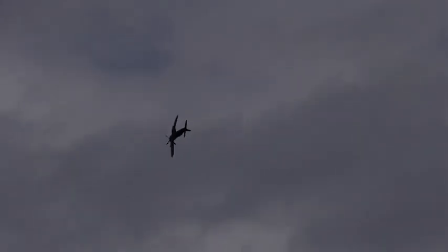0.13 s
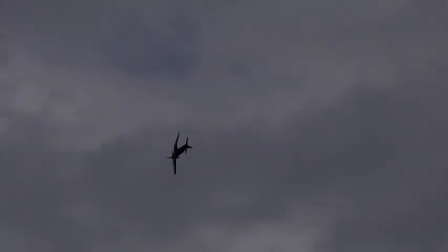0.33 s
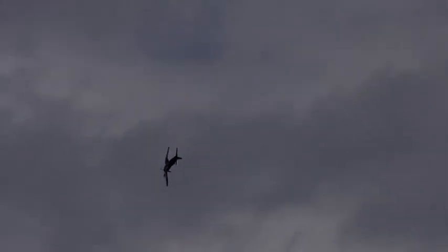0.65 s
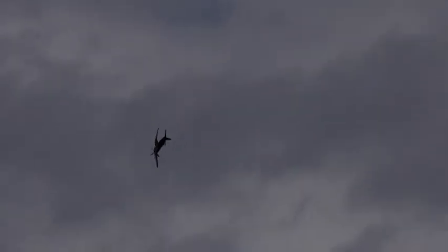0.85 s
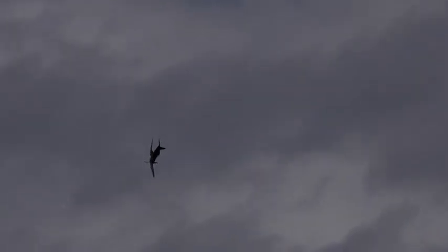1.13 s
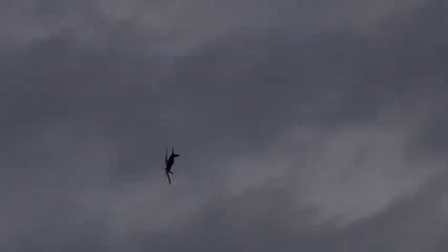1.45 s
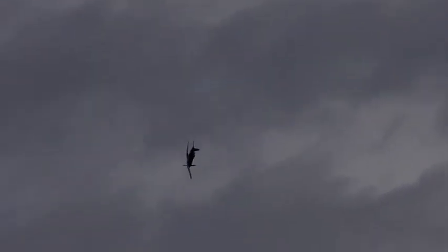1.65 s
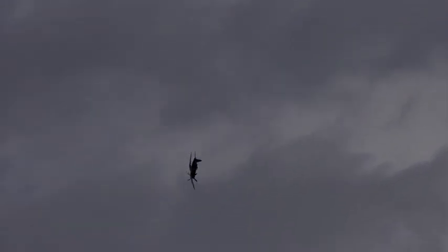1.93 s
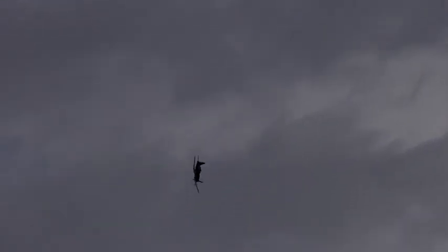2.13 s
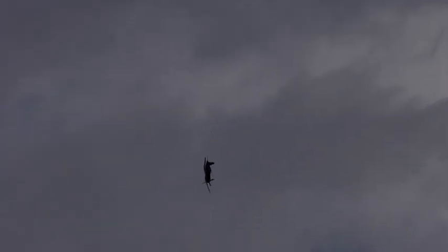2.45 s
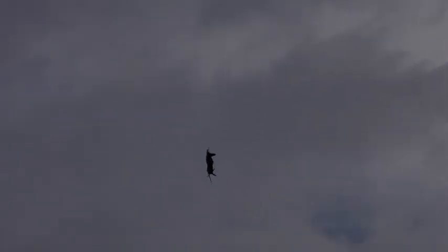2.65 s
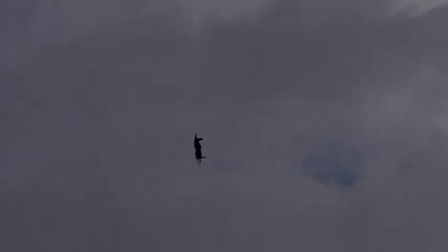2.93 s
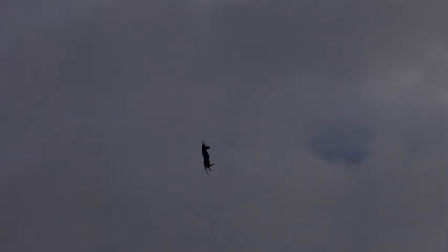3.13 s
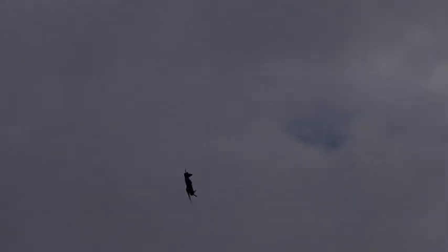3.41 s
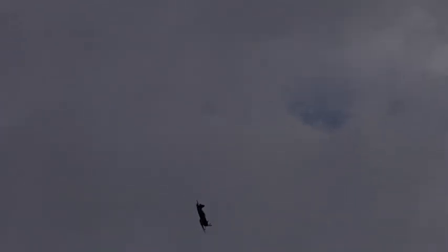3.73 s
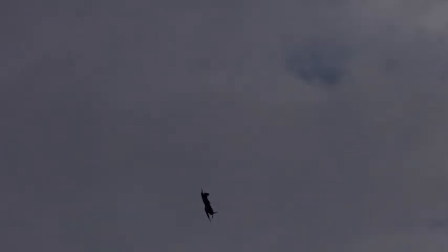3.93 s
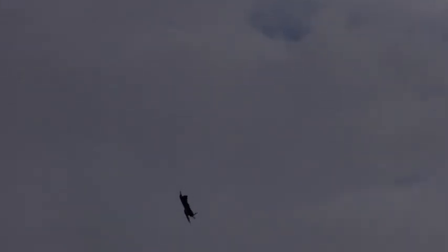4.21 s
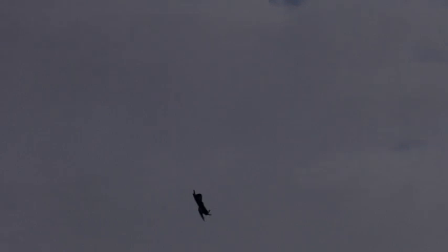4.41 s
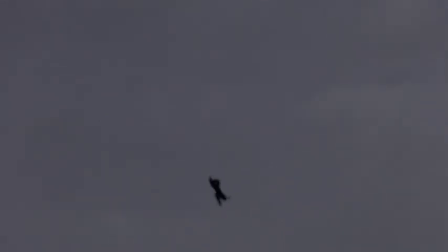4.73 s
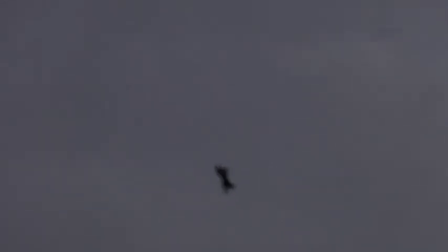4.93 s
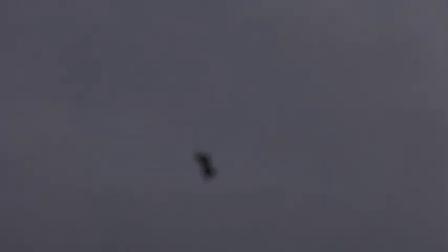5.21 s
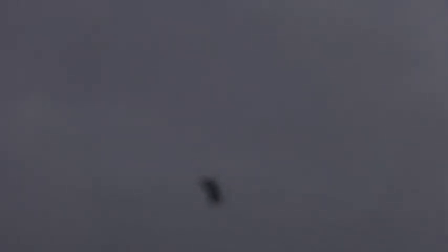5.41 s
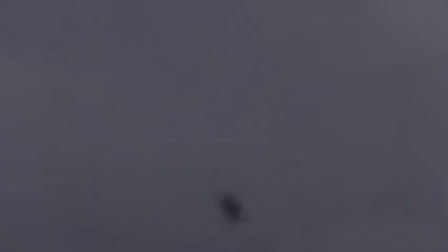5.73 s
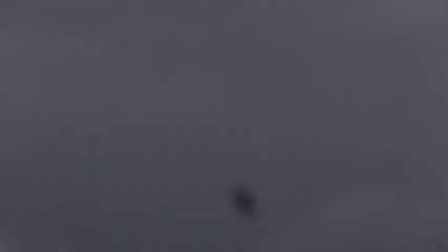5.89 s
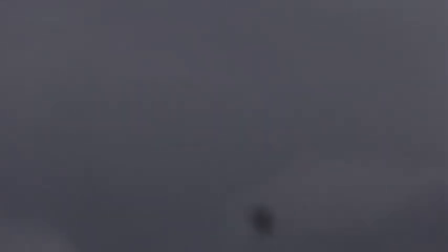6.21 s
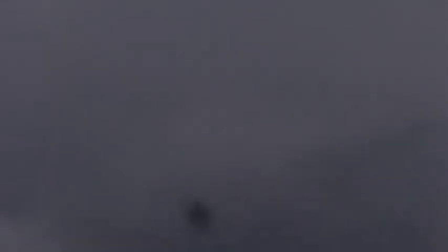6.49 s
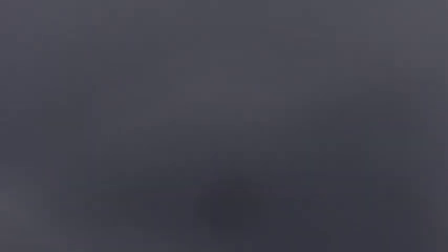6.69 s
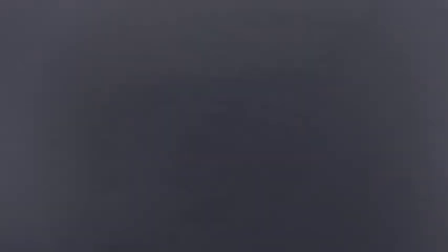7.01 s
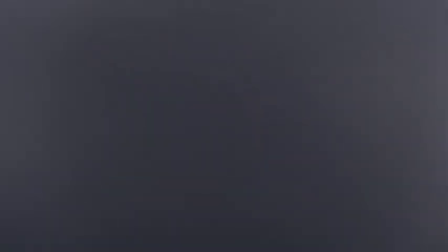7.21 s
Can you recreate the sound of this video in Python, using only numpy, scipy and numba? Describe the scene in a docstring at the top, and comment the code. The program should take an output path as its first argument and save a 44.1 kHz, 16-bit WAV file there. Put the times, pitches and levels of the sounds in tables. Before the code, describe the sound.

Steady, throbbing drone of a propeller plane turning high above, with occasional exhaust cracks, wind buffets and faint close ticking.

```python
"""An airfield, with a big piston-engined propeller plane looping high overhead.
The eighteen firings of each engine cycle give a throbbing stack of tones under a turbulent roar,
with the odd sharp exhaust crack. Gusts thump on the two microphone ports, something close by
rustles and ticks, and the sound drops out once."""
import sys
import numpy as np
from scipy import signal
from scipy.fft import rfft, irfft
from scipy.io import wavfile
from scipy.ndimage import uniform_filter1d
from numba import njit

SR = 44100
rng = np.random.default_rng(int(sys.argv[2]) if len(sys.argv) > 2 else 0)


def waveform_to_disk(signal):
    """Save audio, clipped to [-1, 1], as 16-bit WAV at the path in sys.argv[1]."""
    frames = np.transpose(np.atleast_2d(signal))
    scaled = np.clip(frames, -1, 1) * 32767
    samples = np.round(scaled).astype(np.int16)
    wavfile.write(sys.argv[1], SR, samples)


N = 324135
T = np.arange(N) / SR
HZ = np.maximum(np.arange(N // 2 + 1) * SR / N, 1)
CYLINDERS = 18
ANTIPHASE = np.array([[1], [-1]])  # left and right in opposite polarity

# swells of the nearby rustle: (time [s], level [dB], top band relative to that [dB])
RUSTLE_SWELLS = [(0.0, -63.5, -6), (.14, -63.5, -13), (.6, -56, -8.5), (1.0, -61, -7.5), (1.3, -59, -11),
                 (1.45, -56, -7), (1.8, -58.5, -5.5), (2.3, -65.5, -9.5), (2.55, -72.5, -8),
                 (2.76, -65.5, -16.5), (2.9, -77, -27.5), (3.3, -70.5, -8.5), (3.6, -73, -12),
                 (3.74, -85.5, -15.5), (4.3, -70.5, 1), (4.65, -61.5, -7), (4.8, -67.5, -5.5),
                 (5.1, -61, -5.5), (5.64, -71.5, -4), (5.87, -55.5, -2.5), (6.3, -61, -5), (6.7, -66, -4.5),
                 (6.84, -61.5, -1), (6.96, -77, -12), (7.1, -66, -5.5), (7.35, -66.5, -2)]
# tone colour of the rustle's main band and the tick tails: (frequency [Hz], level [dB])
RUSTLE_SPECTRUM = [(1500, -22), (3000, -1), (4500, -1), (6000, 0), (7800, -8), (10000, -13)]


def engine_tones(cycle, shimmer_db=1.0, weak_shimmer_db=2.5):
    """Multiples (orders) of the engine's cycle rate, bunched in time so that each cycle throbs."""
    # tones with a level of their own, strong and medium: (order)
    strong_orders = [7, 11, 14, 18, 25]
    mid_orders = [10, 12, 13, 15, 16, 17]
    # two groups of weak tones: (order, level within the group [dB])
    low_orders = [(4, -9), (5, -20), (6, -19.5), (8, 2.5), (9, 0)]
    high_orders = [(19, 3), (20, 0), (21, 3), (22, -5), (23, -1), (24, 7.5), (26, 4.5), (27, 5), (28, -0.5),
                   (29, -8), (30, -15.5)]
    # single tones swell or fade for a moment: order -> (time [s], change [dB], half length [s])
    wavers = {10: [(6.4, 4, .3)], 11: [(1.25, 5.5, 0.26), (5.8, -9.5, 0.29)], 13: [(0.0, -0.5, 0.36),
              (2.25, -6, .15), (6.3, 7.5, 0.64)], 14: [(0.0, -5, 0.13), (1.8, -8.5, 0.097),
              (3.6, -1.5, 0.099), (5.7, -2.5, 0.12)], 15: [(0.0, -4, 0.63), (1.35, 5.5, 0.36),
              (4.0, 4, 0.32), (6.3, 6, 0.9)], 16: [(1.8, -8.5, 0.37), (3.15, 8.5, 0.17),
              (4.5, -29.5, 0.096)], 17: [(.8, -2, 0.27), (1.4, 3.5, 0.25), (4.0, 6, .25), (6.45, 10, 0.31)],
              18: [(.55, 5.5, 0.6), (1.8, 2.5, 0.12), (5.4, -5.5, 0.13), (5.72, 5, 0.13),
              (7.1, -2.5, 0.23)], 25: [(2.5, 2, 0.86), (3.02, -10.5, 0.17)]}
    groups = [[(order, 0)] for order in strong_orders + mid_orders] + [low_orders, high_orders]
    gather_s = np.maximum(T - 3.7, 0)  # from 3.7 s on the tones bunch ever tighter
    spread = .05 - .01112 * gather_s
    stack = 0
    for group, level_db in zip(groups, radiated_levels()):
        group_rms = np.sqrt(np.sum(undb(np.array(group)[:, 1]) ** 2) / 2)
        for order, db in group:
            turns = order * cycle - .35 - .14 * gather_s  # all tones slip back as they gather
            turns -= spread * (order - 14) ** 2  # orders far from 14 lag
            turns -= .02223 * (order - 11) * T  # the bunch slides through the cycle as the plane turns
            turns -= .11 * (order % 2)  # the two cylinder rows differ, which shifts the odd orders
            # turbulent air shakes each tone's level and arrival time, the weak ones most
            shake_db = shimmer_db * walk(7) if len(group) == 1 else weak_shimmer_db * walk(4)
            if order not in strong_orders:
                turns += .07 * walk(2.5)
            turns += .04 * walk(9)
            gain = undb(level_db + db + shake_db + swells(wavers.get(order, []))) / group_rms
            sign = -1 if order == 11 else 1  # order 11 pushes against the bunch
            stack += sign * gain * np.cos(2 * np.pi * turns)
    return stack * undb(.8 * walk(35))  # the beats vary in strength


def radiated_levels():
    """Level curve in dB of each tone group as the turning plane shows another side."""
    # what the engine radiates our way at five even stages of the turn:
    # (orders 7, 11, 14, 18, 25, 10, 12, 13, 15, 16, 17 [dB each], low group [dB], high group [dB])
    radiation = [(-33, -27, -30, -38.5, -36.5, -38, -53.5, -31.5, -30.5, -30, -32.5, -35, -30),
                 (-40.5, -22.5, -26, -28, -30.5, -50, -46, -33, -28, -31.5, -29, -40, -30),
                 (-39.5, -25, -25, -23, -34.5, -39, -33, -37.5, -37.5, -41.5, -32, -38, -32),
                 (-32.5, -30.5, -29, -25.5, -54.5, -34, -33.5, -48, -35, -32, -39, -39, -33),
                 (-22, -43, -32, -25.5, -65, -32, -52, -54, -44, -34.5, -37, -39, -31)]
    # the loop: (time [s], stage of the turn [0-1], gain of all tones [dB])
    flight = [(0.0, 0, 3), (0.3, 0.06, 2.5), (0.9, 0.12, 0), (1.2, 0.07, 0), (1.7, 0.11, 1),
              (2.4, 0.23, 1.5), (2.8, 0.34, 1), (3.1, 0.35, 1.5), (3.6, 0.31, 0), (3.9, 0.4, -0.5),
              (4.4, 0.46, -2.5), (4.8, 0.51, 1), (5.1, 0.73, 1), (5.45, 0.62, 0), (5.7, 0.8, 1),
              (6.0, 0.76, -0.5), (6.35, 0.76, 2.5), (6.9, 0.72, -1), (7.35, 0.88, -1)]
    turn, gain_db = curves(flight)
    stages = np.linspace(0, 1, len(radiation))
    return [gain_db + np.interp(turn, stages, db) for db in np.transpose(radiation)]


def exhaust_pulses(cycle, cylinder_db):
    """Every firing gives a bang and a decaying puff of gas, sized by its cylinder and by chance."""
    firing = cycle * CYLINDERS
    index = firing.astype(int)
    chance = np.tanh(rng.standard_normal(index[-1] + 1))[index]
    size = undb(cylinder_db[index % CYLINDERS] + 4.4 * chance)
    bangs = unit(size * np.diff(index, prepend=index[0]))
    flow = .5 + size * np.exp(-(firing % 1) / .66)
    puffs = unit(flow * rng.standard_normal(N))
    return puffs + undb(-12) * bangs


def exhaust_roar(cycle, cylinder_db):
    """The exhaust sounds through six resonances, each drifting and swelling in the turbulent air."""
    # shape of the roar: (time [s], level near 720 Hz [dB], main level [dB], main centre [Hz],
    # level near 1.4 kHz [dB], level near 1.8 kHz [dB])
    contour = [(0.0, -51, -24, 1175, -26.5, -26), (0.12, -29, -32, 1035, -40.5, -44),
               (0.18, -38.5, -32, 1140, -34, -35), (0.35, -23, -27, 942, -33.5, -41.5),
               (0.39, -31.5, -29.5, 1020, -38, -44.5), (0.65, -31.5, -32.5, 940, -40, -40.5),
               (0.96, -34.5, -28, 1080, -31, -38), (1.06, -36, -31, 900, -41, -42),
               (1.33, -33.5, -36.5, 1137, -40, -43), (1.39, -35.5, -29.5, 1150, -35.5, -42),
               (1.49, -32, -31, 1120, -35, -35), (1.6, -32.5, -28.5, 997, -34, -55),
               (1.62, -37.5, -37.5, 1100, -35, -39), (1.76, -31.5, -32.5, 1008, -36.5, -42),
               (2.17, -30.5, -30, 1036, -38, -37), (2.5, -36, -34, 1080, -36.5, -43),
               (2.64, -27.5, -29.5, 870, -42, -41.5), (2.78, -36, -32, 977, -45.5, -47),
               (3.07, -32.5, -33, 1022, -40.5, -46.5), (3.38, -29.5, -27, 916, -40, -46),
               (3.64, -28, -26, 983, -31, -32), (3.83, -35, -33, 926, -39.5, -38),
               (4.07, -30.5, -31.5, 1060, -50, -46), (4.22, -30.5, -28, 1023, -30.5, -34),
               (4.38, -35, -28, 963, -43, -47.5), (4.44, -34, -36, 1073, -40.5, -44),
               (4.79, -31, -32, 1010, -38.5, -42), (5.04, -35, -38.5, 980, -42.5, -46),
               (5.28, -38.5, -36, 1030, -39.5, -46.5), (5.4, -27, -26, 955, -41, -44.5),
               (5.49, -33.5, -29.5, 984, -32.5, -39), (5.73, -33.5, -28.5, 1015, -34, -42.5),
               (5.87, -31.5, -28.5, 963, -40, -45), (6.2, -31, -31, 950, -38.5, -43.5),
               (6.26, -62.5, -30.5, 966, -41.5, -44), (6.47, -29.5, -35.5, 980, -43.5, -48),
               (6.55, -27.5, -27.5, 986, -44, -43.5), (6.86, -40, -40.5, 1056, -43, -43.5),
               (7.27, -30.5, -34, 1038, -41, -44.5), (7.35, -36.5, -31, 1007, -41, -41)]
    # the five resonances around the main one: (centre [Hz])
    side_hz = [393.4, 716.5, 1401, 1840, 2235]
    # all six resonances, low to high: (width [Hz])
    widths = [278, 352, 396, 480, 520, 465]
    below_db, main_db, main_hz, above_db, high_db = curves(contour)
    low_db = -33 + .26 * (main_db - main_db.mean())  # the low end partly follows the main swells
    below_db = np.maximum(below_db, main_db - 11)
    centres = side_hz[:2] + [main_hz] + side_hz[2:]
    levels = low_db, below_db, main_db, above_db, high_db, high_db - 8.5
    exhaust = exhaust_pulses(cycle, cylinder_db)
    # the air bends a second, weaker path, whose wandering delay sweeps a comb over the roar
    delay_s = .0045 + .0006 * walk(2.5)
    exhaust = exhaust + undb(-8) * np.interp(T - delay_s, T, exhaust)
    ragged_db = .9 * walk(18)
    roar = 0
    for hz, width, db in zip(centres, widths, levels):
        band = resonance(exhaust, hz * (1 + .03 * walk(4)), width)
        roar += undb(db + ragged_db + walk(11)) * unit(band)
    return roar


def exhaust_cracks():
    """Sharp cracks from the exhaust, each ringing for a few periods near 1 kHz."""
    # single cracks: (time [s], level [dB], pitch [Hz])
    cracks = [(0.345, -9, 900), (0.825, -15, 973), (1.258, -17.5, 973), (1.374, -14, 1134),
              (1.499, -10, 1094), (2.732, -13.5, 894), (2.869, -27, 984), (4.14, -16.5, 1044),
              (4.258, -16.5, 970), (6.013, -17.5, 1010), (6.531, -23.5, 1010), (6.646, -13.5, 990)]
    return bursts(cracks, cycles=2.65, rise=.71)


def scattered_roar(cycle, cylinder_db, centre_hz=2450, width_hz=3000):
    """A second, thinner roar stands for sound scattered in from the ground, and widens the image."""
    band = 1j * HZ * width_hz / (centre_hz ** 2 - HZ ** 2 + 1j * HZ * width_hz)
    thin_roar = filtered(exhaust_roar(cycle, cylinder_db), band ** 3)
    return undb(-5) * ports(thin_roar) * ANTIPHASE


def wind_buffets(thump_db=-38.5, flutter_db=-40.5):
    """Gusts thump on both microphone ports at once, over a flutter that differs between them."""
    # gusts that raise the thump: (time [s], boost [dB], half length [s])
    gusts = [(0.0, 12.5, 0.1), (.65, 3, 0.22), (1.37, 7.5, 0.091), (1.83, 5, 0.13), (4.25, 13.5, 0.14),
             (4.582, 12.5, 0.096), (5.5, 12, 0.13), (5.968, 11, 0.15), (6.775, 5, 0.063), (7.35, 15, 0.069)]
    # tone colours of the thump and the flutter: (frequency [Hz], level [dB])
    thump_spectrum = [(20, -41), (40, -19.5), (65, -4.5), (100, 1), (200, 3), (450, -16.5)]
    flutter_spectrum = [(20, -15.5), (50, -15.5), (100, 1), (300, -6), (450, -6.5), (900, -27)]
    rustle_db, _ = curves(RUSTLE_SWELLS)
    surge_db = swells(gusts) + .42 * (rustle_db - rustle_db.mean())  # partly follows the rustle
    thump = undb(thump_db + surge_db + 1.7 * walk(6.6)) * wind_noise(thump_spectrum)
    flutter = undb(flutter_db + 2.5 * walk(8)) * wind_noise(flutter_spectrum)
    return thump + flutter * ANTIPHASE


def close_rustle(hiss_db=-69.5):
    """Grainy flurries in two bands, partly different at each port, over a faint steady hiss."""
    # tone colours of the rustle's top band and the hiss: (frequency [Hz], level [dB])
    top_spectrum = [(4000, -24), (6000, 1), (7500, -1.5), (8800, -3.5), (10500, 0.5), (13500, -13),
                    (15000, -12.5), (16000, -24.5)]
    hiss_spectrum = [(2200, -22), (3000, -19.5), (4200, -9.5), (8000, -6), (15500, -16.5)]
    rustle_db, top_db = curves(RUSTLE_SWELLS)
    flurry_db = 1.3 * walk(6) + 1.2 * walk(40) + 1.8 * walk(160)  # shared by both bands
    bed = undb(hiss_db) * np.array([colour(rng.standard_normal(N), hiss_spectrum) for _ in range(2)])
    for spectrum, db in ((RUSTLE_SPECTRUM, rustle_db), (top_spectrum, rustle_db + top_db)):
        grain_db = flurry_db + 1.6 * walk(60) + 4.2 * walk(500)
        grains = undb(grain_db) * rng.standard_normal((3, N))
        both, left, right = (colour(noise, spectrum) for noise in grains)
        bed += undb(db) * (both + 1.31 * np.array([left, right]))
    return np.array([ports(bed[0])[0], ports(bed[1])[1]])


def close_ticks(tail_s=.01, tail_db=-24.5):
    """Each tick is a dull knock, placed left or right, with a bright snap and a grainy tail."""
    # single ticks: (time [s], level [dB], snap relative to that [dB], left minus right [dB])
    ticks = [(0.539, -24, -13, 2), (0.589, -20, -5, 12), (0.8485, -24, -13, 8), (0.9118, -24.5, -9, 15),
             (1.1623, -24, -1, 6), (1.2067, -21, -7, 10), (1.3295, -30, 7, -2.0), (1.4556, -22.5, -17, 17),
             (1.7579, -19.5, -9.5, 11), (2.2223, -45.5, -9.5, 1), (2.6737, -37, -3, 5),
             (3.1815, -29.5, -4.5, -1), (3.48, -37, 1.5, -3), (4.0467, -25.5, -23, 10),
             (4.5755, -45, -16, 12), (5.8556, -38, -4, -13), (6.0437, -32, 2, -1.0), (6.2058, -30, -8, -9)]
    knocks = [bursts([(s, db + side * pan_db / 2, 4800) for s, db, _, pan_db in ticks], cycles=.52)
              for side in (1, -1)]
    snaps = bursts([(s, db + snap_db, 11000) for s, db, snap_db, _ in ticks], cycles=1.4)
    tails = sum(undb(db + tail_db) * (T > s) * np.exp(-abs(T - s) / tail_s) for s, db, *_ in ticks)
    grains = colour(undb(3 * walk(600)) * rng.standard_normal(N), RUSTLE_SPECTRUM)
    return np.array(knocks) + ports(snaps + tails * grains)


def ports(x):
    """One sound reaches the two microphone ports with a different level and phase."""
    # stereo image: (frequency [Hz], left minus right [dB], left's phase lead [rad])
    image = [(60, 1, -0.33), (393, 0.06, 0.41), (660, 2, 0.47), (900, 8.5, 0.21), (1100, 7, 1),
             (1750, 11.5, -1.4), (2080, 3.5, 0.65), (2980, 6, 0.95), (6000, 0.5, -0.086), (8850, -2, 0.4),
             (15000, -10, -.6)]
    db, lead = over_hz(image)
    return np.array([filtered(x, undb(side * db / 2) * np.exp(.5j * side * lead)) for side in (1, -1)])


def dropout(x, at_s=4.4524, fade_out_s=.003, fade_in_s=.016, click_db=-22):
    """The sound breaks off with a click and fades back in."""
    since = T - at_s
    gain = np.where(since < 0, -since / fade_out_s, since / fade_in_s)
    click = undb(click_db) * np.exp(np.minimum(since, 0) / .0006) * (since < 0)
    return x * np.minimum(gain, 1) + click


def bursts(events, cycles, rise=.5):
    """Short rings at (time [s], level [dB], pitch [Hz]); decay (cycles) and rise are in periods."""
    length = 2000
    t = np.arange(length) / SR
    track = np.zeros(N + length)
    for s, db, hz in events:
        start = int(s * SR)
        envelope = (1 - np.exp(-(t * hz / rise) ** 2)) * np.exp(-t * hz / cycles)
        track[start:start + length] += undb(db) * envelope * np.sin(2 * np.pi * hz * t)
    return track[:N]


@njit
def resonance(x, hz, width):
    """Steep band-pass with a moving centre: three state-variable stages."""
    y, band, low = np.empty(len(x)), np.zeros(3), np.zeros(3)
    for i in range(len(x)):
        g, damping, sample = np.tan(np.pi * hz[i] / SR), width / hz[i], x[i]
        for j in range(3):
            v = (band[j] + g * (sample - low[j])) / (1 + g * (g + damping))
            band[j] = 2 * v - band[j]
            low[j] += 2 * g * v
            sample = damping * v
        y[i] = sample
    return y


def wind_noise(spectrum):
    """Low noise of a given tone colour, rolled off to nothing by 3 kHz."""
    return colour(rng.standard_normal(N), spectrum + [(3000, -90)])


def walk(rate):
    """Smooth random drift with about `rate` new values a second and a spread near 1."""
    hold = int(SR / rate)
    steps = np.repeat(rng.standard_normal(N // hold + 1), hold)
    return 1.3 * uniform_filter1d(uniform_filter1d(steps, hold), hold)[:N]


def swells(events):
    """Sum of bell-shaped level changes at (time [s], change [dB], half length [s])."""
    return sum(db * np.exp(-((T - s) / half_s) ** 2) for s, db, half_s in events)


def colour(x, spectrum):
    """Give white noise the spectrum of a table, at rms 1."""
    return unit(filtered(x, undb(over_hz(spectrum)[0])))


def filtered(x, gain):
    """Apply a gain to every frequency bin."""
    return irfft(rfft(x) * gain, N)


def curves(table):
    """Columns of a time table at every sample."""
    s, *columns = np.transpose(table)
    return [np.interp(T, s, c) for c in columns]


def over_hz(table):
    """Columns of a frequency table at every bin."""
    hz, *columns = np.transpose(table)
    return [np.interp(np.log(HZ), np.log(hz), c) for c in columns]


def undb(db):
    """Decibels to gain."""
    return 10 ** (np.asarray(db) / 20)


def unit(x):
    """Scale to rms 1."""
    return x / np.sqrt(np.mean(x ** 2))


def scene():
    """The plane and its scattered roar, with wind, rustle and ticks close by."""
    # engine speed as heard: (time [s], firing rate [Hz])
    speed = [(0.0, 319.7), (0.4, 315.6), (0.8, 312.0), (1.6, 308.2), (2.0, 306.7), (2.8, 306.7),
             (3.6, 307.1), (4.0, 307.0), (4.4, 308.0), (5.2, 309.9), (5.6, 310.4), (6.0, 310.0),
             (6.4, 311.7), (6.8, 312.6), (7.2, 313.1), (7.35, 312.5)]
    cycle = np.cumsum(curves(speed)[0]) / CYLINDERS / SR  # engine cycles elapsed
    cylinder_db = 2.2 * rng.standard_normal(CYLINDERS)  # each cylinder has its own loudness
    plane = engine_tones(cycle) + exhaust_roar(cycle, cylinder_db) + exhaust_cracks()
    scattered = scattered_roar(cycle, cylinder_db)
    return ports(plane) + scattered + wind_buffets() + close_rustle() + close_ticks()


def record(dry, top_hz=15700):
    """The microphone housing cuts two notches, the sound drops out once, and the top is cut off."""
    # housing notches: (zero [Hz], zero width [Hz], pole [Hz], pole width [Hz])
    notches = [(594, 8, 620, 220), (2700, 60, 2720, 500)]
    gain = 1
    for hz, width, pole_hz, pole_width in notches:
        gain *= (hz ** 2 - HZ ** 2 + 1j * HZ * width) / (pole_hz ** 2 - HZ ** 2 + 1j * HZ * pole_width)
    high_cut = signal.ellip(10, .2, 80, top_hz, fs=SR, output="sos")
    return signal.sosfilt(high_cut, dropout(filtered(dry, gain)))


dry = scene()
out = record(dry)
waveform_to_disk(out)
```